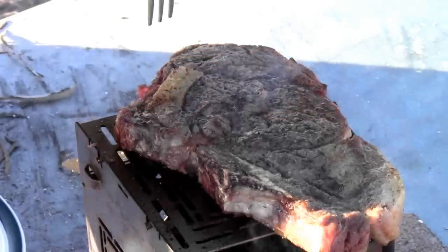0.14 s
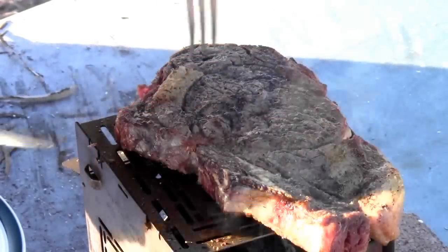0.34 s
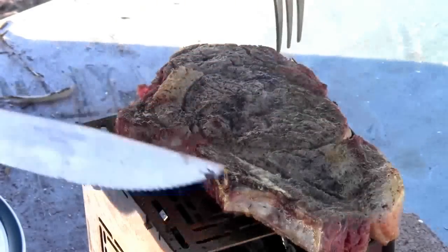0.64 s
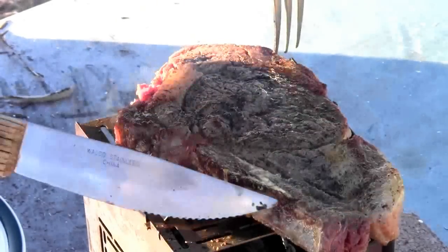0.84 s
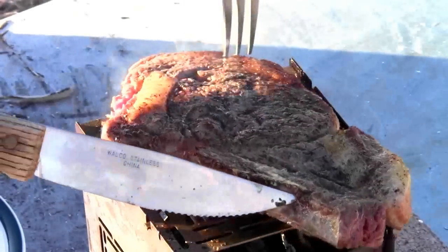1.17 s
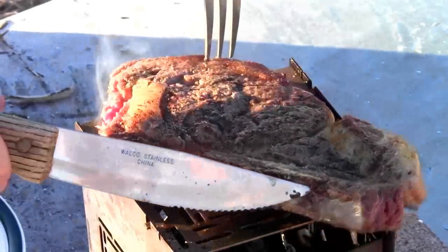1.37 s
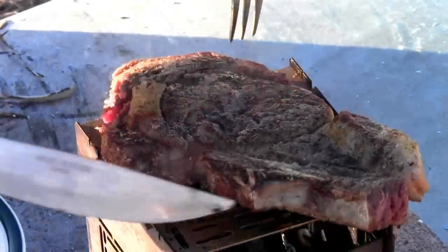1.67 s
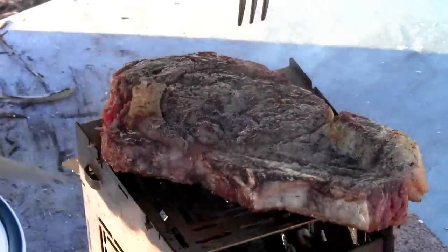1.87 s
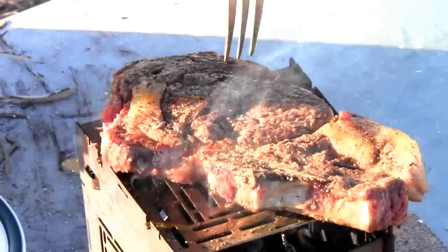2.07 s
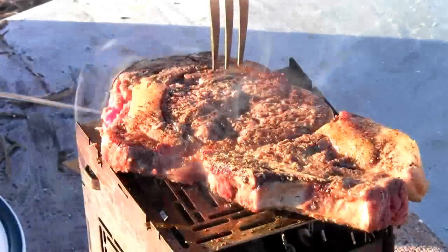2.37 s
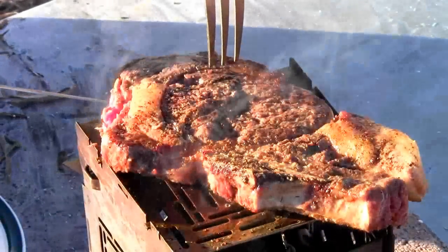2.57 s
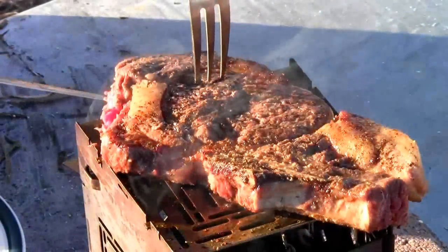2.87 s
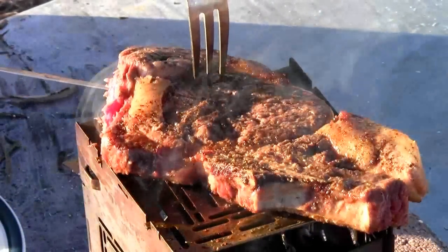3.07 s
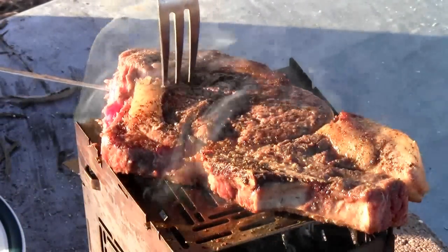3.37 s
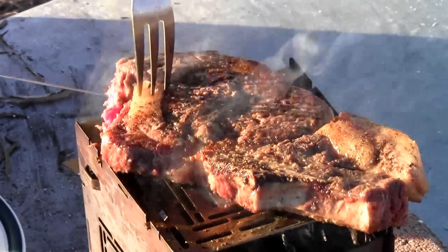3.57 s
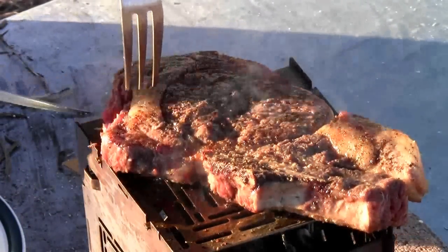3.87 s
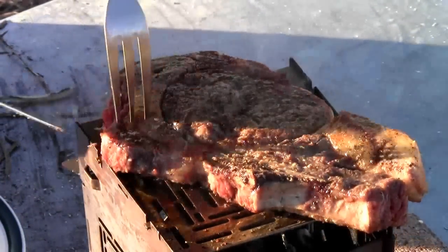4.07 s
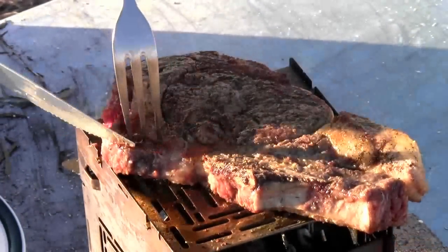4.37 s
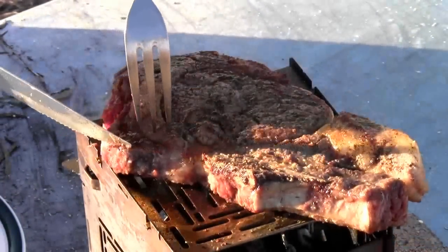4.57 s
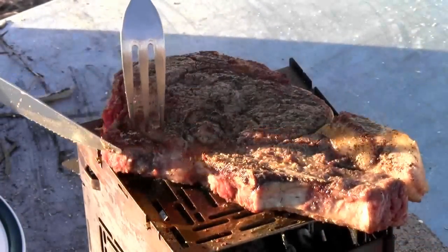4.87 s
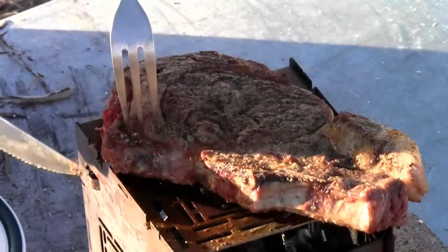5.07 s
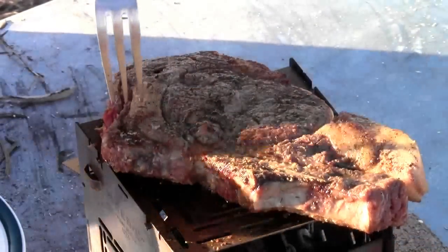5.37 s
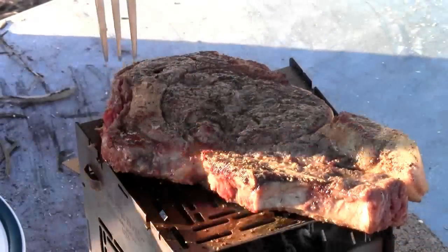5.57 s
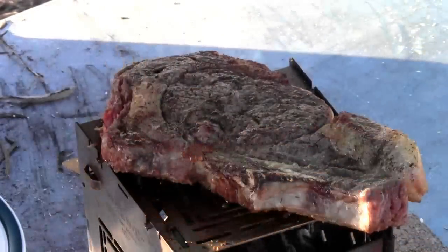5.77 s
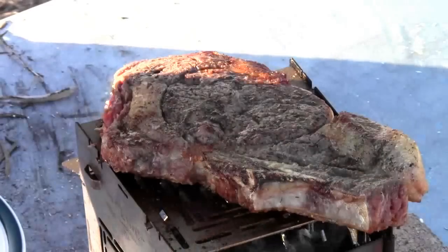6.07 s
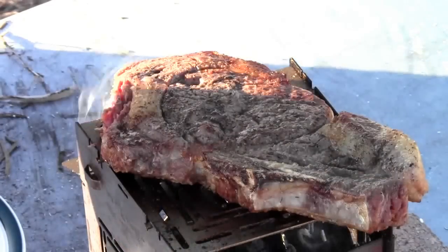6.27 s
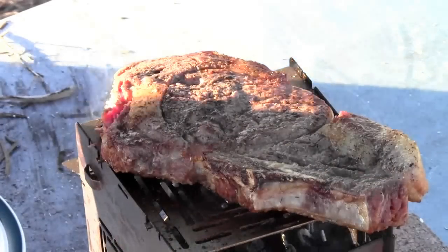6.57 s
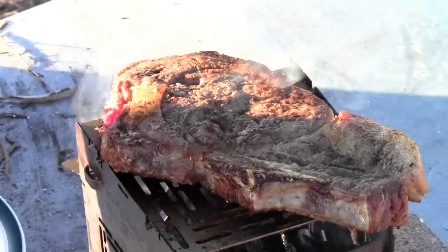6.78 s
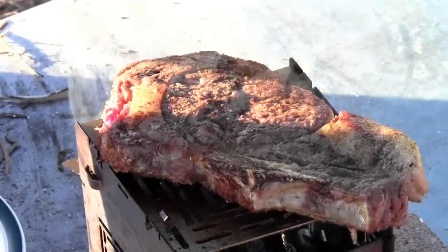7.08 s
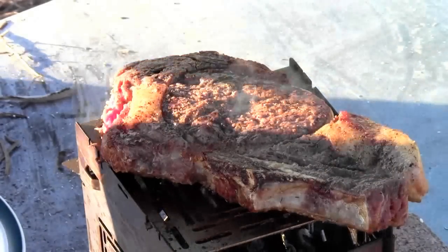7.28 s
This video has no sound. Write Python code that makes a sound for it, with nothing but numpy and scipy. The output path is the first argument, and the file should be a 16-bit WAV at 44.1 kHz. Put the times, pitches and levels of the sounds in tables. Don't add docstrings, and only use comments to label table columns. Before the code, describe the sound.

A thick steak sizzles on a small steel grill outdoors, fat spitting sharply, with dull cutlery thuds and one late metallic clack.

```python
import sys
import numpy as np
from scipy import signal
from scipy.fft import rfft, irfft
from scipy.io import wavfile
from scipy.ndimage import uniform_filter1d

SR = 44100
rng = np.random.default_rng(int(sys.argv[2]) if len(sys.argv) > 2 else 0)


def wav_record(signal):
    frames = np.transpose(np.atleast_2d(signal))
    bounded = np.clip(frames, -1, 1)
    quanta = np.round(bounded * 32767).astype(np.int16)
    wavfile.write(sys.argv[1], SR, quanta)


def volts(x):
    e = np.asarray(x, float) / 20
    return 10 ** e


N = 327222
T = np.arange(N) / SR
HZ = np.fft.rfftfreq(N, 1 / SR)

# t/s, level/dB, bubble size (-1 fine to 1 large)
FIZZ_COURSE = [(0, -55, 0.24), (.5, -55.5, 0.032), (.84, -57, 0.34), (.94, -53, -0.17), (1.1, -56, .5),
               (1.29, -54, .5), (1.35, -48.5, -0.35), (1.64, -40.5, 0.3), (2.44, -44.5, 0.25),
               (2.87, -44.5, 0.09), (2.99, -49, -0.16), (3.24, -49, -0.53), (3.35, -52.5, -.4),
               (3.81, -52, -0.24), (3.92, -46, .3), (4.3, -48, 0.54), (5.3, -50, -0.28),
               (7.42, -54.5, -0.58)]
# f/Hz, level/dB per Hz
BURST_TONE = [(150, -37), (300, 2), (600, 2.5), (1000, -1.5), (2000, 0), (4000, -1.5), (7000, 0.5),
              (9000, 0.5), (11000, -1.5), (13000, -8.5), (15000, -1.5)]
# delay/ms, signed gain
BOUNCES = [(0.181, -0.13), (0.333, 0.07), (0.589, -0.08), (0.739, 0.08), (0.999, 0.16), (1.086, -0.13),
           (1.152, -0.05), (1.75, -0.03), (1.988, -0.02), (2.424, -0.03), (3.048, -0.01), (3.494, 0.01)]
# f/Hz, width/Hz, level/dB
BOX_HOLLOWS = [(795, 50, -14), (1640, 55, -12), (2080, 70, -4), (2350, 80, -3), (3090, 170, 3.2),
               (3560, 35, -10), (4150, 250, 2.8), (4700, 70, -3.5), (6500, 90, -3)]
# t/s, peak level/dB, bubble pitch f/Hz
BIG_SPITS = [(.032, -29, 6200), (.058, -25, 6600), (.0783, -33, 4000), (.1762, -33, 7700),
             (.3034, -35, 5500), (.6261, -33, 6600), (.7085, -36, 4500), (.8044, -29, 6400),
             (.9078, -32, 6000), (.9196, -33, 6200), (1.1267, -34, 6400), (1.1905, -32, 5200),
             (1.624, -16, 5800), (1.6903, -23, 4900), (1.9804, -24, 6800), (2.1087, -23, 5100),
             (2.1657, -25, 5400), (2.2894, -18, 6500), (2.834, -21, 6200), (2.9518, -27, 8800),
             (3.2278, -28, 7900), (4.376, -29, 6200), (4.595, -23, 5600), (4.6278, -27, 6400),
             (4.9919, -29, 6500), (5.1953, -29, 9300), (5.8124, -31, 6300), (6.3681, -30, 7800),
             (6.7937, -32, 6000), (7.2069, -31, 7500),
             (.0565, -31, 7000), (.0573, -31, 7400), (.061, -34, 4600), (.181, -38, 4800),
              (.9615, -35, 6000), (.9989, -34, 6700), (1.3327, -31, 6100), (1.3856, -30, 6200),
              (1.4068, -30, 7100), (1.4147, -30, 5300), (1.56, -27, 5500), (1.9319, -25, 5200),
              (2.258, -28, 5500), (2.3285, -27, 6800), (3.8943, -30, 4600), (3.9703, -29, 4600),
              (4.072, -33, 5500), (4.1975, -33, 4000), (6.7743, -33, 6600), (6.838, -36, 6500),
              (6.7313, -31, 7200)]
# t/s, peak level/dB, pitch f/Hz
MEAT_THUDS = [(1.649, -34, 1230), (1.665, -34, 1200), (1.672, -44.5, 396), (1.695, -39, 1270),
              (2.209, -35, 1390), (2.609, -39.5, 1210), (2.734, -41, 1470), (3.207, -41, 1420),
              (4.072, -46, 900), (4.104, -33, 1106), (4.109, -32, 936), (4.11, -40, 403),
              (4.114, -34, 1450), (4.118, -43, 362), (4.1195, -32, 2200), (4.555, -40, 930),
              (4.594, -38, 1430), (5.22, -45.5, 510), (5.798, -44, 400), (6.707, -35, 410)]
# t/s, peak level/dB, pitch f/Hz
BOX_ROCKING = [
    (6.713, -38, 766),
    (6.717, -50, 543),
    (6.722, -48, 880),
    (6.769, -44, 810),
    (6.769, -41, 2410),
]
# t/s, peak level/dB, rattle length/ms
STEEL_CLACKS = [
    (6.6985, -21, 1.5),
    (6.6997, -20, 2.),
    (6.7035, -25, 4.),
    (6.711, -35, 10.),
    (6.768, -38, 4.),
]
# f/Hz, level/dB, t60/s
STEEL_MODES = [(530, -13, 0.14), (796, -11, 0.095), (1240, -30, .04), (1890, -2, 0.11), (2345, 0, 0.078),
               (2960, 2, 0.035), (3230, -2, 0.061), (4000, 3, 0.032), (4460, -6, 0.025), (5180, -1, .02),
               (6420, 5, 0.019), (7900, 2, 0.025), (8600, 1, 0.022), (9500, -3, 0.014), (10600, -7, .01)]
# t/s, level/dB, length/ms, pitch f/Hz
BLADE_SCRAPES = [
    (4.105, -43, 17, 820),
    (4.118, -43, 5, 1500),
    (4.195, -47, 8.8, 1990),
    (4.593, -41, 5.7, 2000),
    (6.712, -51.5, 43, 595),
    (6.768, -47.5, 8, 2500),
]
# f/Hz, level/dB per Hz
SHARED_AIR = [(15, -48), (30, -21.5), (55, -13.5), (73, -2.5), (84, -5.5), (105, -3), (134, 2), (182, -9),
              (250, -6), (318, -15), (486, -19), (866, -22.5), (1700, -28), (3500, -72)]
# f/Hz, level/dB per Hz
WIDE_AIR = [(20, -23), (118, -23.5), (200, 0.5), (300, 1), (570, -0.5), (1040, -6), (1730, -17),
            (3080, -28), (6000, -47), (12000, -68)]
# t/s, level/dB
RUMBLE_SWELL = [(0, 4), (1.2, 4), (2.4, 3.5), (3.4, 3), (4.4, 0.5), (5, 2.7), (5.6, 2), (6.5, 2.5),
                (7.42, 4)]


def evened(x):
    return x / np.sqrt(np.mean(x ** 2) + 1e-20)


def read(points, hz):
    f, value = np.transpose(points)
    return np.interp(np.log(hz + 1), np.log(f + 1), value)


def add(mix, s, sound):
    part = mix[round(s * SR):][:len(sound)]
    part += sound[:len(part)]


def drift(ms):
    span = max(round(ms * SR / 1000), 1)
    smooth = uniform_filter1d(rng.standard_normal(N), span)
    return evened(uniform_filter1d(smooth, span))


def click(pitch_hz=6000, focus_db=0, stretch=1, echo=1, octaves=0.97):
    hz = np.fft.rfftfreq(2048, 1 / SR)
    off_pitch = np.log2((hz + 1) / pitch_hz) / octaves
    tint_db = focus_db * (np.exp(-off_pitch ** 2) - 1)
    box_db = sum(db / (1 + ((hz - f) / width) ** 2) for f, width, db in BOX_HOLLOWS)
    log_gain = np.log(volts(read(BURST_TONE, hz) + tint_db + box_db))
    circle = np.r_[log_gain, log_gain[-2:0:-1]]
    pulse = np.exp(np.conj(signal.hilbert(circle)))[:len(hz)]
    bounces = sum(g * np.exp(-2j * np.pi * hz * ms * stretch / 1000) for ms, g in BOUNCES)
    return irfft(pulse * (1 + echo * bounces))[:1024]


def fizz(per_s=14000, seethe_db=0.9, focus_db=18, trim_db=1.85, count=6):
    s, fizz_db, size = np.transpose(FIZZ_COURSE)
    size_db, flicker_db, surge_db = 3, 0.4, 0.25
    out = np.zeros(N)
    for fineness, place in zip(np.linspace(-1, 1, count), rng.uniform(-2.1, 1, count)):
        luck_db = 2.9 * np.minimum(rng.exponential(1, N), 4)
        balance_db = size_db * fineness * np.interp(T, s, size)
        strength = volts(luck_db + seethe_db * drift(40) - balance_db)
        sign = rng.choice([-1, 1], N)
        bursts = rng.random(N) < per_s / count / SR
        bubble = click(3600 * 3.36 ** fineness, focus_db, 1 + 0.004 * place, 0.57)
        out += signal.oaconvolve(strength * sign * bursts, bubble)[:N]
    out = evened(out * volts(flicker_db * drift(19)))
    return volts(np.interp(T, s, fizz_db) + trim_db + surge_db * drift(120)) * out


def small_spits(count=110, over_db=17, spread_db=1, pitch_hz=6600):
    when = rng.random(count) * T[-1]
    strength, size = rng.standard_normal((2, count))
    s, fizz_db, _ = np.transpose(FIZZ_COURSE)
    db = np.interp(when, s, fizz_db) + over_db + spread_db * strength
    return list(zip(when, db, pitch_hz * 1.11 ** size))


def spits(spatter_db=-19, spatter_ms=3.5):
    out, t = np.zeros(N), np.arange(700) / SR
    for s, db, hz in BIG_SPITS + small_spits():
        droplets = rng.standard_normal(len(t)) ** 3 / 4
        spray = volts(spatter_db) * droplets * np.exp(-t * 1000 / spatter_ms)
        spray[0] = 1
        pop = signal.fftconvolve(spray, click(hz * (hz / 6500) ** 1.5, 7, 1, 1.7))
        add(out, s, volts(db + 1.5) * pop / abs(pop).max())
    return out


def thuds(meat_cycles=22, box_cycles=48):
    out, t = np.zeros(N), np.arange(5000) / SR
    soft_start = 1 - np.exp(-t / 0.0004)
    for rows, cycles in ((MEAT_THUDS, meat_cycles), (BOX_ROCKING, box_cycles)):
        for s, db, hz in rows:
            decay = volts(db - 60 * t * hz / cycles)
            add(out, s, decay * np.sin(2 * np.pi * hz * t) * soft_start)
    return out


def clacks(tick_db=6, per_s=4000):
    out, t = np.zeros(N), np.arange(8000) / SR
    ring = sum(volts(db - 60 * t / t60) * np.sin(2 * np.pi * hz * t) for hz, db, t60 in STEEL_MODES)
    ring /= abs(ring).max()
    tick = click()
    add(ring, 0, volts(tick_db) * tick / abs(tick).max())
    for s, db, ms in STEEL_CLACKS:
        sign, when = rng.random((2, 1500))
        fade = np.exp(-(t[:1500] * 1000 / ms) ** 2)
        rattle = (2 * sign - 1) * (when < per_s / SR) * fade
        rattle[0] = 1
        hit = signal.fftconvolve(rattle, ring)
        add(out, s, volts(db) * hit / abs(hit).max())
    return out


def scrapes(focus_db=30):
    out, t = np.zeros(N), np.arange(3000) / SR
    for s, db, ms, hz in BLADE_SCRAPES:
        rough = rng.standard_normal(len(t)) ** 3
        grit = evened(signal.fftconvolve(rough, click(hz, focus_db))[:len(t)])
        shape = np.exp(-(t * 1000 / ms) ** 2) * np.minimum(t / 0.00086, 1)
        add(out, s, volts(db) * grit * shape)
    crack_s, crack_db, crack_ms, crack_hz = 6.6985, -27, 8, 3500
    steel_grain = click(crack_hz, 14.3, 0.86, 0.35, 1.54)
    grit = evened(signal.fftconvolve(rng.standard_normal(len(t)), steel_grain)[:len(t)])
    shape = np.exp(-t * 1000 / crack_ms) * np.minimum(t / 0.0019, 1)
    add(out, crack_s, volts(crack_db) * grit * shape)
    return out


def air(shared_db=-55.5, wide_db=-62.5):
    shared, apart = (irfft(rfft(rng.standard_normal(N)) * volts(read(tone, HZ)), N)
                     for tone in (SHARED_AIR, WIDE_AIR))
    rumble = volts(np.interp(T, *np.transpose(RUMBLE_SWELL))) * shared
    opposed = np.array([[1], [-1]])
    return volts(shared_db) * evened(rumble) + volts(wide_db) * evened(apart) * opposed


def scene():
    return fizz() + spits() + thuds() + clacks() + scrapes() + air()


def band_limit(x):
    return signal.sosfilt(signal.butter(12, 14170, fs=SR, output="sos"), x)


def record(dry, edge_hz=13260):
    low_pass = signal.firwin(801, edge_hz, window=("kaiser", 9), fs=SR)
    limited = signal.oaconvolve(dry, low_pass[None], "same")
    return band_limit(limited)


dry = scene()
out = record(dry)
wav_record(out)
```